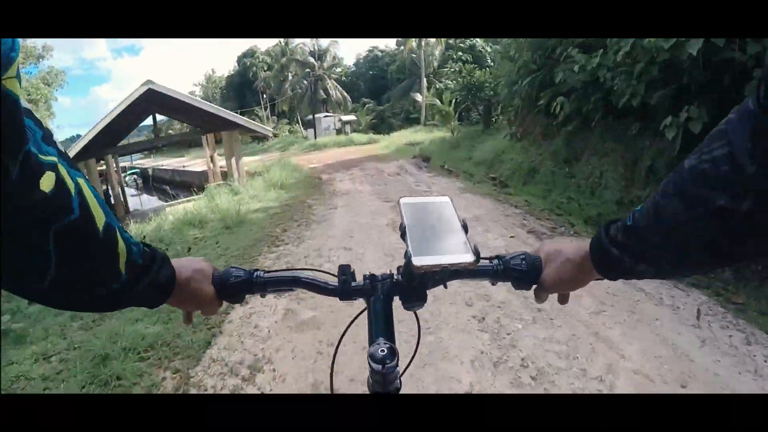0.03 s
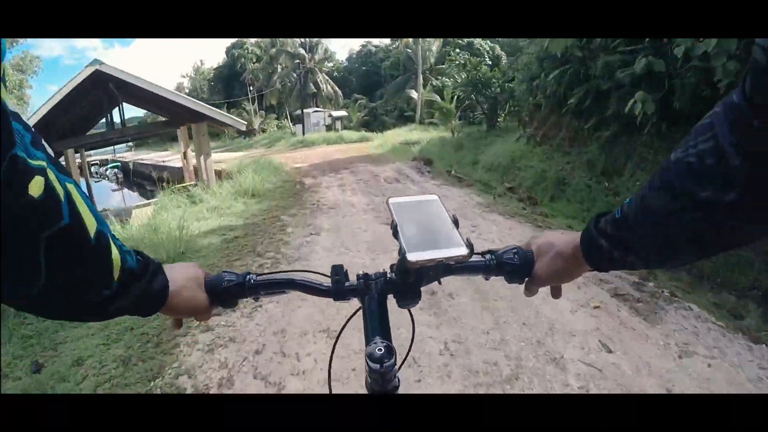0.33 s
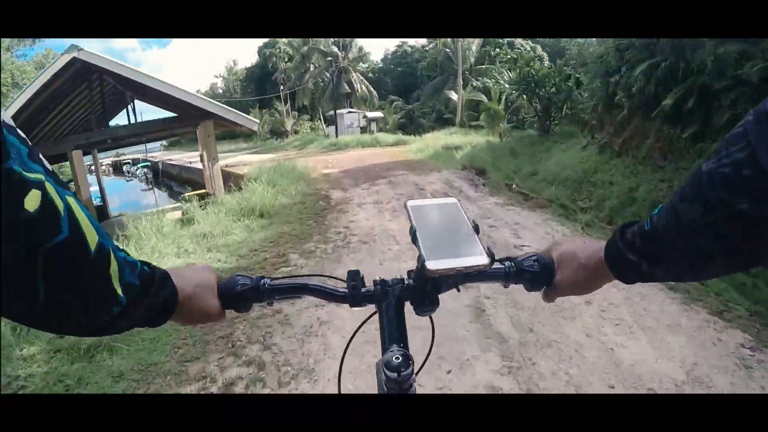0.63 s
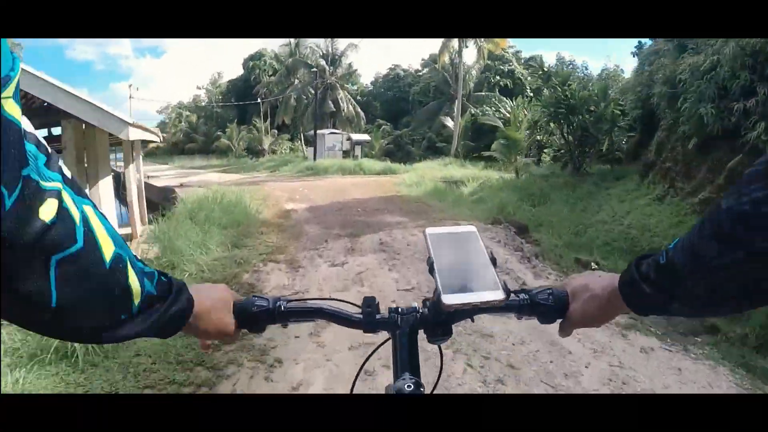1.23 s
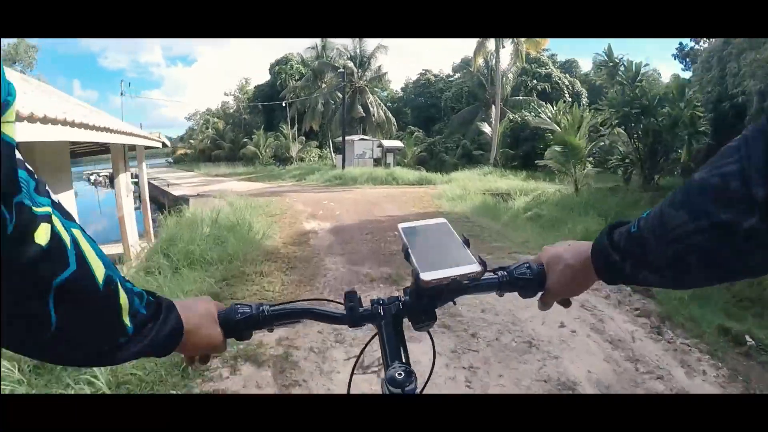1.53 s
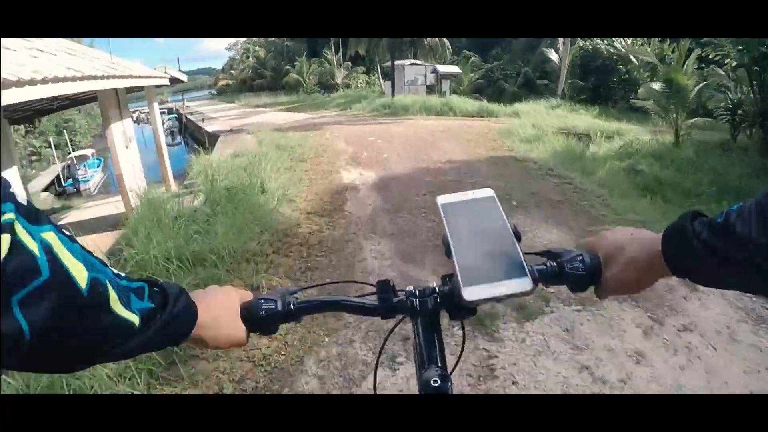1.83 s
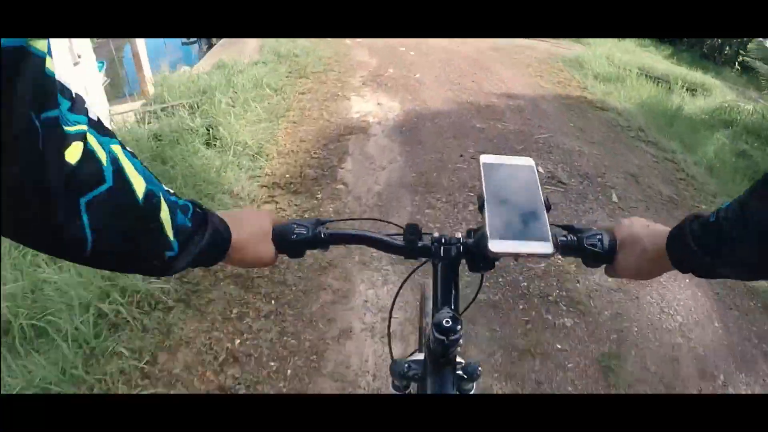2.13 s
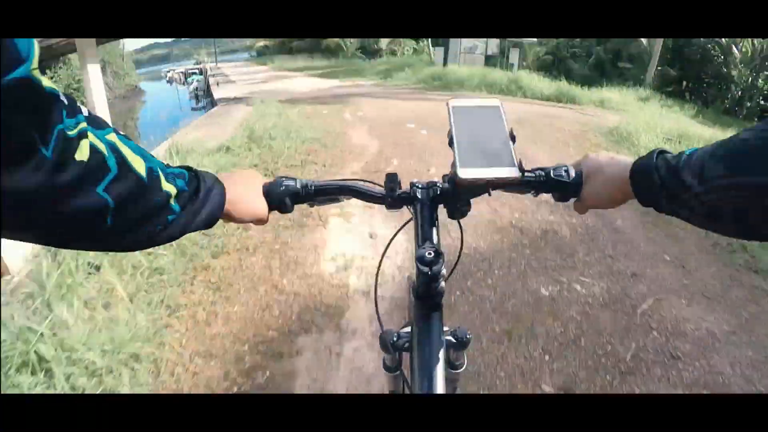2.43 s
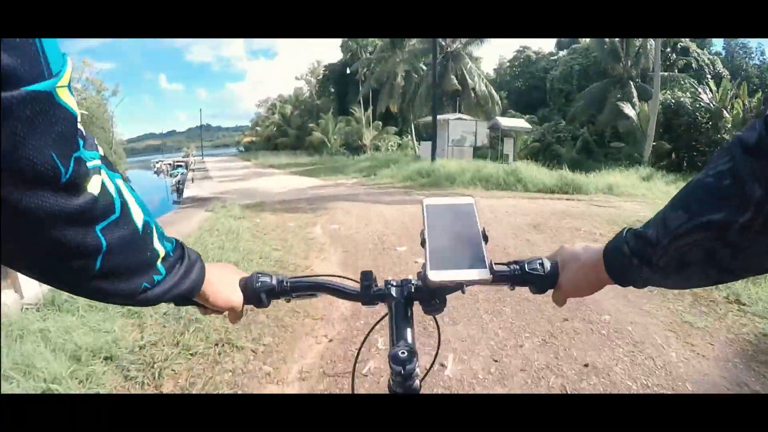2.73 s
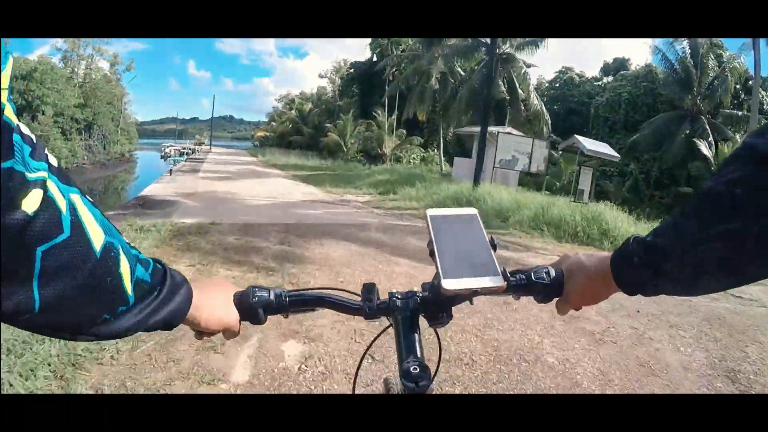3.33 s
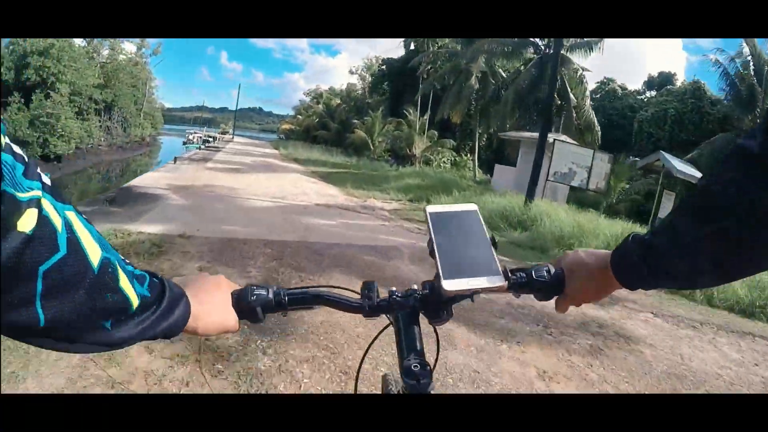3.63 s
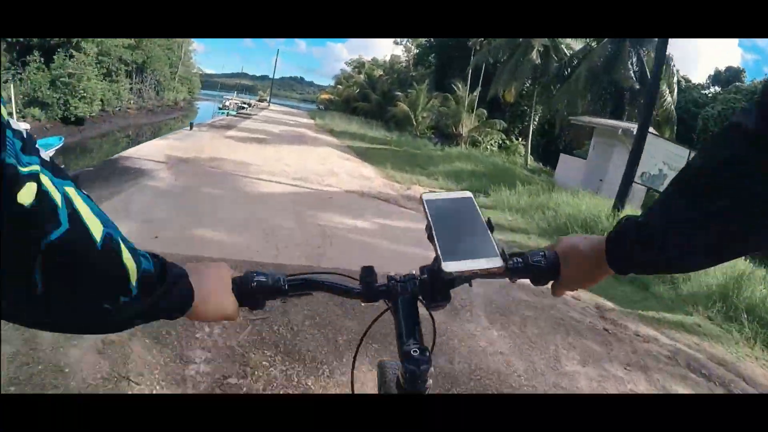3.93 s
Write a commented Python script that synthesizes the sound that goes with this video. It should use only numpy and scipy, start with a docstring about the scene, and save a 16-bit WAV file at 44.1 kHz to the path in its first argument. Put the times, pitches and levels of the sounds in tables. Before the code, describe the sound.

A bicycle coasts along a gravel track, tyres crunching and freewheel ticking. Midway, stones ping off the metal and the chain rattles, then the ride smooths out. Wind and low thuds from bumps hit the rider's microphone throughout.

```python
"""A bicycle coasts down a gravel track: its tyres crunch and pop over stones and its freewheel ticks.
On a rough stretch midway two stones strike the bike and make it ring, the chain rattles against
the frame and a tyre ploughs through loose gravel. Pebbles click together now and then.
It is all heard from a camera on the rider's chest, jolted by bumps and buffeted by the wind."""
import sys
import numpy as np
from scipy import signal
from scipy.fft import rfft, irfft
from scipy.io import wavfile
from scipy.ndimage import uniform_filter1d

SR = 44100
rng = np.random.default_rng(int(sys.argv[2]) if len(sys.argv) > 2 else 0)


def materialize(psi):
    """Save the field psi as 16-bit PCM at rate SR to the path in sys.argv[1].

    A 1-D psi becomes a single channel; in a 2-D psi each row is a channel.
    """
    bounded = np.clip(np.atleast_2d(psi).T, -1, 1)
    quanta = np.round(bounded * 32767).astype(np.int16)
    wavfile.write(sys.argv[1], SR, quanta)


N = 176400
TIME = np.arange(N) / SR


# How loud the rolling tyres are: t/s, level/dB
CRUNCH_LEVEL = [(0.0, -40), (0.37, -42), (0.82, -39.5), (1.28, -42), (1.68, -38), (1.83, -37.5),
                (2.29, -34.5), (2.46, -37), (3.27, -38.5), (3.58, -38.5), (3.81, -40), (4.0, -41)]
# Tone of the crunch, from low to high: f/Hz, level/dB
CRUNCH_TONE = [(150, -3), (320, 0), (480, 0), (570, 2.5), (690, -2), (900, 1.5), (1220, -5.5), (1450, -4),
               (1800, -3.5), (2150, -12), (2400, -19), (2850, -7.5), (3300, -15.5), (4500, -15.5),
               (5500, -23), (15000, -35)]
def tyre_crunch():
    """Gravel grinds under the tyres: many tiny clicks over a hiss, with a fluttering level."""
    clicks = amp(-1.5) * gravel(per_kind_per_s=50, t60=0.011, size=N)
    hiss = amp(-3) * rng.standard_normal(N)
    level_db = curve(CRUNCH_LEVEL) + 1.33 * drift(hz=36)
    return colour((clicks + hiss) * amp(level_db), CRUNCH_TONE)


# Stones popping out from under the tyres: t/s, level/dB, f/Hz
STONE_POPS = [(0.603,-22,620),(1.181,-28,1800),(1.608,-23,880),(1.645,-20,1670),(1.678,-24,530),(1.7844,-19,585),(1.79,-15,630),(1.847,-21,895),(2.048,-22,900),(2.356,-15,680),(2.689,-26.5,1610),(2.798,-18,1400),(2.964,-20,1480),(3.1312,-18.5,1000),(3.228,-14.5,890),(3.547,-25,1000),(3.599,-20.5,970)]
# Tone of a pop: f/Hz, level/dB
POP_TONE = [(150, 11), (350, 3.5), (570, 5.5), (700, -3), (920, 0.5), (1250, -4.5), (1650, 0.5),
            (2300, -14), (2900, -11), (5000, -22), (15000, -42)]
def stone_pops():
    """A stone squirts from under the tread: one crack into the tyre, a brief note, then crumbs."""
    force = amp(-7.5) * knocks(STONE_POPS, t60=0.037, rise_s=0.00073)  # the crumbs
    notes = np.zeros(N)
    t, note_t60 = TIME[:4000], 0.013
    for s, db, hz in STONE_POPS:
        add(force, s, amp([db + 6]))  # the crack, one sample long
        add(notes, s, amp(db - 60 * t / note_t60) * np.sin(2 * np.pi * hz * t))
    return colour(force, POP_TONE) + notes


# A tyre ploughing through loose gravel: t/s, time to fade by 6.5 dB/s, level/dB
GRAVEL_SCRAPES = [(1.659, 0.046, -39.5), (1.845, 0.03, -29.5), (1.92, 0.031, -31.5), (1.974, 0.036, -34),
                  (2.121, 0.027, -34.5), (2.349, 0.044, -22)]
# Tone of a scrape: f/Hz, level/dB
SCRAPE_TONE = [(150, 0), (550, 4.5), (1300, 2.5), (2100, -4), (2800, -2), (4500, -10), (8000, -13.5),
               (15000, -12.5)]
def gravel_scrapes():
    """Loose gravel gives way in short, dense bursts of clicks."""
    out = np.zeros(N)
    t, rise_s = TIME[:SR // 4], 0.0044
    for s, fade_s, db in GRAVEL_SCRAPES:
        shape = np.minimum(t / rise_s, 1) * amp(db - 6.5 * (t / fade_s) ** 2)
        add(out, s, shape * gravel(per_kind_per_s=300, t60=0.0091, size=len(t)))
    return colour(out, SCRAPE_TONE)


# How fast the freewheel's teeth pass: t/s, f/Hz
TOOTH_RATE = [(0.0, 52.95), (0.3, 55.01), (0.9, 54.86), (1.3, 50.61), (1.42, 57.12), (1.52, 65.46),
              (1.75, 53.29), (2.3, 54.38), (2.7, 50.61), (2.9, 60.76), (3.15, 54.33), (3.4, 62.32),
              (3.55, 54.7), (3.75, 59.76), (4.0, 53.48)]
# Pitches at which the wheel's hub rings: f/Hz, width/Hz, level/dB
HUB_RESONANCES = [(2830, 140, 2), (3650, 170, 1.5), (4870, 100, 4.5), (7050, 180, -0.5), (7630, 320, -5.5),
                  (8130, 94, 0), (9820, 140, 2), (9910, 92, 8.5), (10900, 120, -7), (14000, 310, -6)]
def freewheel():
    """Two small catches drop off each tooth, one just after the other, and ring the hub."""
    teeth_passed = np.floor(np.cumsum(curve(TOOTH_RATE)) / SR + .28)  # starts partway along a tooth
    jitter_s, spread_db = .0005, 2
    ticks = np.zeros(N)
    for s in TIME[1:][np.diff(teeth_passed) > 0]:
        late, force = rng.standard_normal(2)
        for lag_s, db in ((0, -41.5), (0.0033, -44)):  # the two catches
            tick = chatter(t60=.017, rise_s=0.00028)
            add(ticks, s + lag_s + jitter_s * late, tick * amp(db + spread_db * force))
    swell = amp(0.95 * drift(hz=5))
    return body(ticks, HUB_RESONANCES, direct_db=-6) * swell


# Chain and cables slapping the frame: t/s, level/dB, tube's ring relative to the slap/dB
CHAIN_SLAPS = [(0.713,-36,-15),(1.755,-32,-15),(1.866,-29,-1),(1.908,-25.5,-10),(2.049,-21.5,-5),(2.086,-25,4),(2.172,-25,-15),(2.230,-17.5,-1),(2.2335,-24,-6),(2.252,-22,-10),(2.293,-25,0),(2.390,-21.5,-5),(2.4077,-12.5,-12),(2.429,-18,-3),(2.4868,-14.5,-6),(2.59,-27.5,-9),(2.661,-29,-10),(2.823,-27.5,-12)]
# Pitches at which the chain and frame ring: f/Hz, width/Hz, level/dB
CHAIN_RESONANCES = [(2670, 130, 8.5), (3280, 550, -2), (4330, 490, -1), (5650, 140, 2.5), (7530, 140, -1),
                    (9320, 200, -2.5), (9980, 190, 5), (13600, 220, -6), (14400, 220, -7)]
# Notes of the frame tube beside the chain: f/Hz, level/dB, time to fade by 60 dB/s
TUBE_NOTES = [(2657, -2.5, .045), (5600, -10, .028)]
def chain_rattle():
    """Each slap is a bright snap and rings the tube, at a pitch that varies with where it lands."""
    slaps = knocks(CHAIN_SLAPS, t60=0.026, rise_s=0.00047)
    out = body(slaps, CHAIN_RESONANCES, direct_db=-0.5)
    detune = .014
    for s, db, ring_db in CHAIN_SLAPS:
        notes = [(hz * (1 + detune * rng.standard_normal()), level, t60) for hz, level, t60 in TUBE_NOTES]
        add(out, s, amp(db + ring_db) * ring(notes))
    return amp(-3.5) * out


# Notes of the wheel rim and of the frame: f/Hz, level/dB, time to fade by 60 dB/s
RIM_NOTES = [(843, -7, 0.043), (3215, -5, 0.029), (4140, 5, 0.019), (5150, -4, .016), (8800, -5, 0.016),
             (9600, 0, 0.0087), (10170, 1, 0.011), (11040, -1, 0.02)]
FRAME_NOTES = [(1645, 2.5, 0.03), (2610, -11, 0.037), (2940, 1, 0.028), (3960, -2, 0.02),
               (4550, 4.5, 0.028), (5920, -6, 0.028), (6130, -1.5, .02), (10100, -1, 0.024),
               (10400, -1, 0.016), (12850, -8.5, 0.055), (13200, -14, .055), (13400, -10, .035)]
def stone_strike(s, notes, level_db, snap_t60):
    """A flung stone cracks against metal, sets it ringing and bounces once."""
    out = np.zeros(N)
    rise_s = 0.0003
    ringing = ring(notes)
    add(out, s, ringing * np.minimum(TIME[:len(ringing)] / rise_s, 1))
    for lag_s, db in ((0, 2), (.0028, -1)):  # the hit and the bounce
        snap = body(chatter(snap_t60, rise_s), CHAIN_RESONANCES, direct_db=4)
        add(out, s + lag_s, amp(db) * snap)
    return amp(level_db) * out


# How loud the spray of small stones is: t/s, level/dB
GRIT_LEVEL = [(0, -55), (1.45, -55), (1.7, -55), (1.92, -47), (2.15, -46), (2.32, -44), (2.44, -42),
              (2.54, -48), (2.9, -70), (4, -76)]
def grit_spray():
    """Small stones patter brightly on the chain and frame, most where the track is rough."""
    grit = gravel(per_kind_per_s=40, t60=0.018, size=N)
    return body(grit * amp(curve(GRIT_LEVEL)), CHAIN_RESONANCES, direct_db=-0.5)


# Pebbles hitting each other: t/s, level/dB
PEBBLE_HITS = [(0.0408,-25),(0.2688,-29.5),(0.6305,-28),(0.8749,-28),(1.1643,-28.5),(1.182,-28),(1.979,-23),(2.100,-17),(2.186,-20),(2.357,-19),(3.362,-26.5)]
# Tone of a pebble's click: f/Hz, level/dB
PEBBLE_TONE = [(800, -14), (2300, -4), (2850, 5), (4400, -2.5), (5500, -7), (9000, -22), (15000, -33)]
def pebble_clicks():
    """Pebbles knock together with short, high clicks."""
    return amp(-3.5) * colour(knocks(PEBBLE_HITS, t60=0.014, rise_s=0.00037), PEBBLE_TONE)


# Bumps in the track: t/s, level/dB
JOLTS = [(0.222,-11.5),(0.283,-15),(0.477,-20),(0.962,-16.5),(1.161,-18),(1.332,-15),(1.38,-13.5),(1.638,-16.5),(2.061,-14.5),(2.18,-20),(2.411,-18),(2.655,-13),(2.812,-15),(2.85,-16),(2.964,-16.5),(3.4,-9),(3.624,-10.5),(3.688,-15.5)]
# Tone of a thud: f/Hz, level/dB
THUD_TONE = [(35, -10), (75, 0.5), (125, 1.5), (185, -7.5), (280, -8), (400, -18), (1000, -52.5)]
def bump_thuds():
    """Each bump jolts the rider and camera with a low thud."""
    return amp(-1) * colour(knocks(JOLTS, t60=0.091, rise_s=0.0034), THUD_TONE)


# How loud the wind is: t/s, rumble level/dB, buffet level/dB
WIND_LEVELS = [(0,-20.5,-28.5),(.45,-17,-29),(.7,-17,-28.5),(.77,-24.5,-33.5),(.92,-21,-33.5),(1.08,-19.5,-28.5),(1.35,-17.5,-30.5),(1.56,-20.5,-32),(1.75,-16,-28.5),(2.03,-16,-30.5),(2.19,-15,-22),(2.26,-23.5,-35),(2.5,-18,-28),(2.58,-25.5,-36.5),(2.63,-15,-25),(2.76,-12.5,-25),(2.86,-17,-24),(2.9,-25,-42),(2.94,-29,-50),(3.01,-26,-44),(3.05,-13,-24.5),(3.19,-20.5,-34),(3.53,-14.5,-26),(4,-17,-29)]
# Tones of the rumble and of the buffets: f/Hz, level/dB
RUMBLE_TONE = [(10, -18.5), (22, -5), (35, 2.5), (50, -4.5), (72, -5), (100, -16), (160, -29.5),
               (400, -74.5)]
BUFFET_TONE = [(50, -15), (90, -2), (120, -1.5), (180, -6), (260, -8), (400, -18), (700, -28.5),
               (2000, -67)]
def wind():
    """Air hits the microphone: a deep, lumpy rumble with quick buffets above it."""
    rumble = steady(colour(rng.standard_normal(N), RUMBLE_TONE), span_s=0.092)
    rush = colour(rng.standard_normal(N), BUFFET_TONE)
    buffets = steady(rush * amp(3.5 * drift(hz=41.4)), span_s=.12)
    return rumble * amp(curve(WIND_LEVELS) + 1) + buffets * amp(curve(WIND_LEVELS, column=2) + 1.5)


def gravel(per_kind_per_s, t60, size, kinds=12):
    """Several kinds of stone, each with its own brief sound, click at random."""
    out = np.zeros(size)
    for _ in range(kinds):
        hits = grains(per_kind_per_s, size)
        out += signal.fftconvolve(hits, chatter(t60, rise_s=.0001))[:size]
    return unit(out)


def grains(per_s, size, spread_db=3):
    """Random clicks, mostly small, a few large."""
    strength = amp(spread_db * np.minimum(rng.exponential(1, size), 4))
    sign = rng.choice([-1., 1.], size)
    return unit(strength * sign * (rng.random(size) < per_s / SR))


def knocks(rows, t60, rise_s):
    """One short, rough knock for each row's time and level."""
    out = np.zeros(N)
    for s, db, *_ in rows:
        add(out, s, amp(db) * chatter(t60, rise_s))
    return out


def chatter(t60, rise_s, size=4000):
    """A flurry of tiny contacts: noise that fades by 60 dB in t60 seconds."""
    t = TIME[:size]
    noise = steady(rng.standard_normal(size), span_s=0.00078)
    return noise * np.minimum(t / rise_s, 1) * amp(-60 * t / t60)


def ring(notes, size=4000):
    """Struck metal: fading pure notes that start a little differently with each blow."""
    t = TIME[:size]
    return sum(amp(db - 60 * t / t60) * np.sin(2 * np.pi * (hz * t + rng.random()))
               for hz, db, t60 in notes)


def body(x, resonances, direct_db, size=2048):
    """Passes a sound through a metal part, giving its ring plus a bright, direct snap."""
    t = TIME[:size]
    ringing = sum(amp(db) * width * np.exp(-np.pi * width * t) * np.cos(2 * np.pi * hz * t)
                  for hz, width, db in resonances)
    snap = signal.lfilter(*signal.butter(2, 2500, "high", fs=SR), signal.unit_impulse(size))
    response = unit(ringing) + amp(direct_db) * unit(snap)
    return signal.fftconvolve(x, response / np.linalg.norm(response))[:len(x)]


def colour(x, tone, size=8192):
    """Shapes the lows and highs of a sound to follow a tone table."""
    hz, db = np.transpose(tone)
    log_hz = np.log(abs(np.fft.fftfreq(size, 1 / SR)) + 1)
    log_gain = np.log(amp(np.interp(log_hz, np.log(hz), db)))
    spectrum = np.exp(np.conj(signal.hilbert(log_gain)))  # so nothing sounds ahead of a hit
    response = np.fft.ifft(spectrum).real[:size // 2]
    return signal.fftconvolve(x, response / np.linalg.norm(response))[:len(x)]


def drift(hz):
    """A random wobble of typical size 1, up to about the given rate."""
    keep_slow = np.exp(-(np.fft.rfftfreq(N, 1 / SR) / hz) ** 2)
    return unit(irfft(rfft(rng.standard_normal(N)) * keep_slow, N))


def steady(x, span_s):
    """Evens out the level over the given span."""
    power = uniform_filter1d(x ** 2, int(span_s * SR) + 1)
    return x / np.sqrt(abs(power) + 1e-12)


def curve(rows, column=1):
    """Joins a table's points with straight lines, giving a value at every sample."""
    rows = np.array(rows)
    return np.interp(TIME, rows[:, 0], rows[:, column])


def add(mix, s, sound):
    """Mixes a sound in at s seconds."""
    part = mix[max(round(s * SR), 0):][:len(sound)]
    part += sound[:len(part)]


def amp(db):
    """Turns decibels into a number to multiply by."""
    return 10 ** (np.asarray(db) / 20)


def unit(x):
    """Scales a signal to a typical size (rms) of 1."""
    return x / np.sqrt(np.mean(x ** 2) + 1e-20)


def scene():
    """The bicycle, the stones, the bumps and the wind, mixed into one channel."""
    bicycle = tyre_crunch() + stone_pops() + gravel_scrapes() + freewheel() + chain_rattle()
    rim_hit = stone_strike(1.4252, RIM_NOTES, level_db=-16.0, snap_t60=0.013)
    frame_hit = stone_strike(1.9496, FRAME_NOTES, level_db=-17.0, snap_t60=0.039)
    stones = rim_hit + frame_hit + grit_spray() + pebble_clicks()
    return (bicycle + stones + bump_thuds() + wind())[None]


def record(dry, cutoff_hz=15350):
    """The camera cuts off the very highest treble."""
    low_pass = signal.firwin(161, cutoff_hz, window=("kaiser", 7), fs=SR)
    return signal.oaconvolve(dry, low_pass[None], "same")


dry = scene()
out = record(dry)
materialize(out)
```